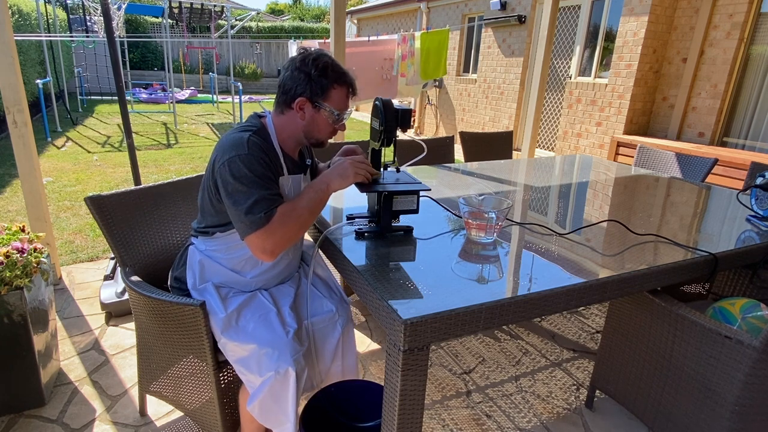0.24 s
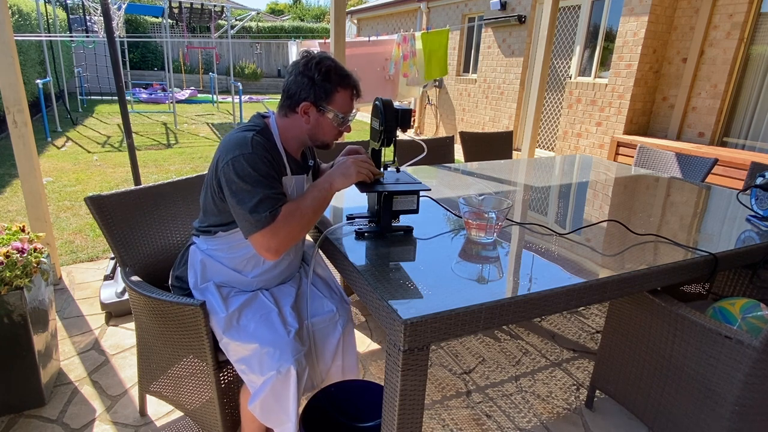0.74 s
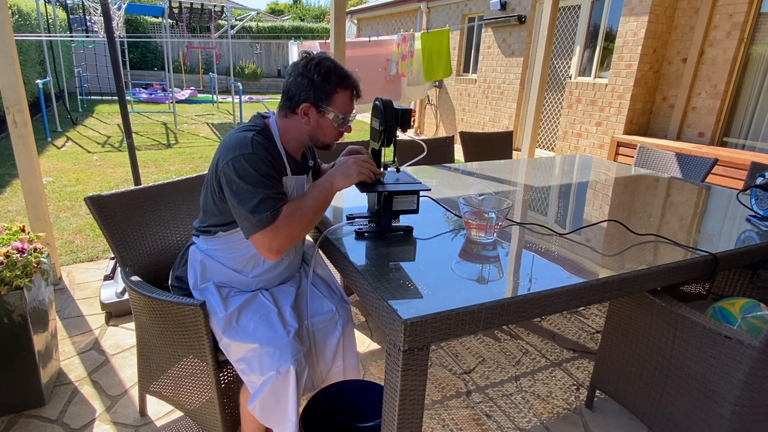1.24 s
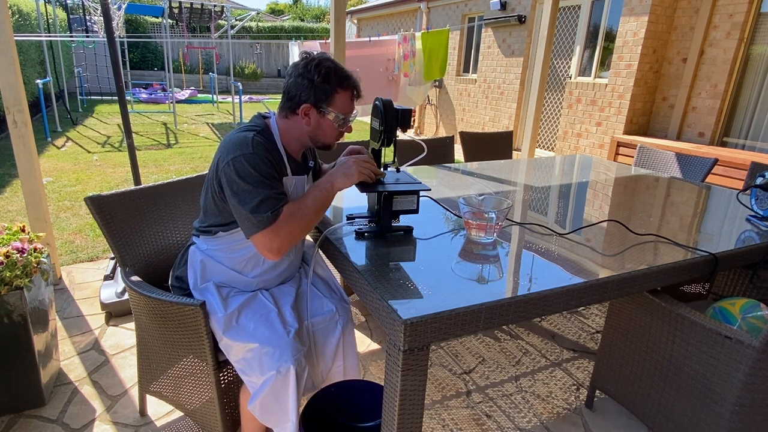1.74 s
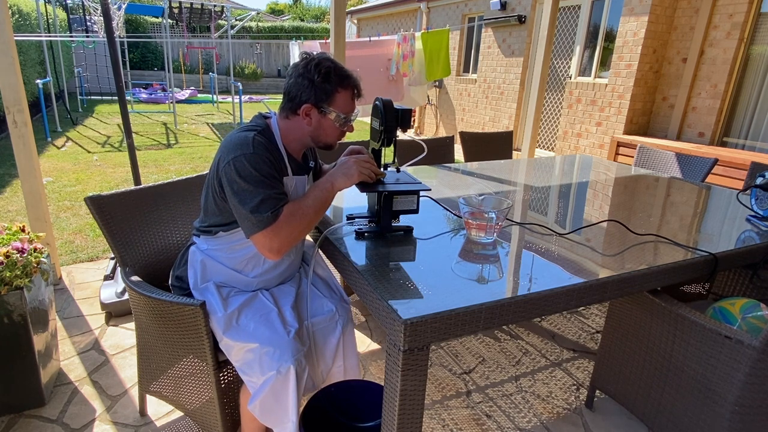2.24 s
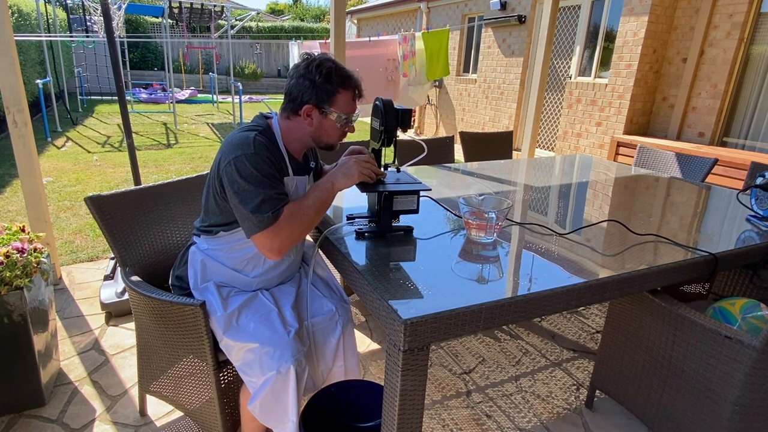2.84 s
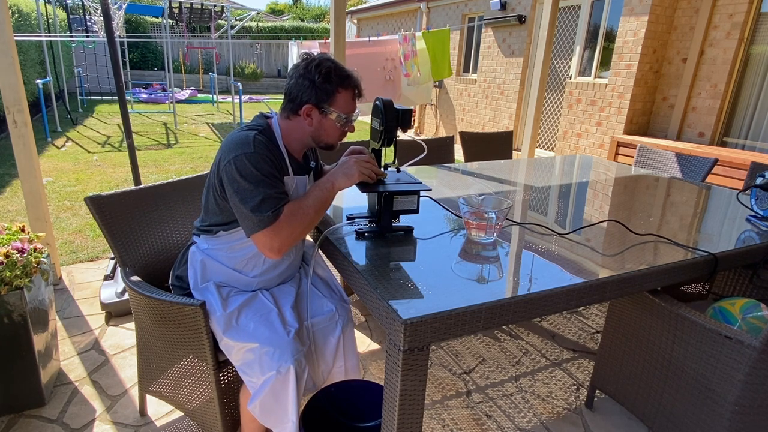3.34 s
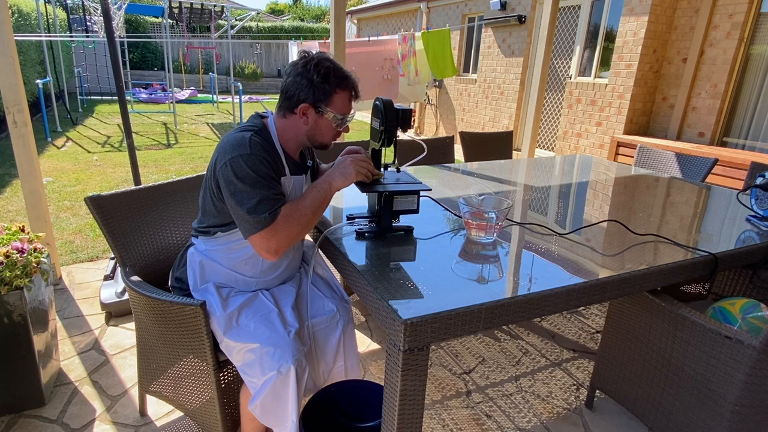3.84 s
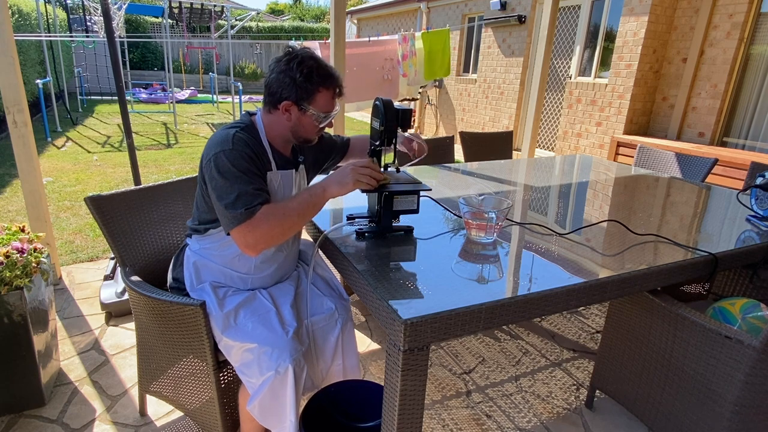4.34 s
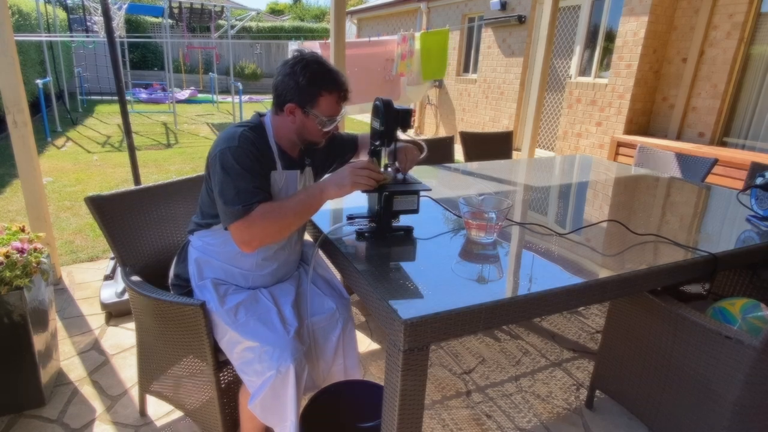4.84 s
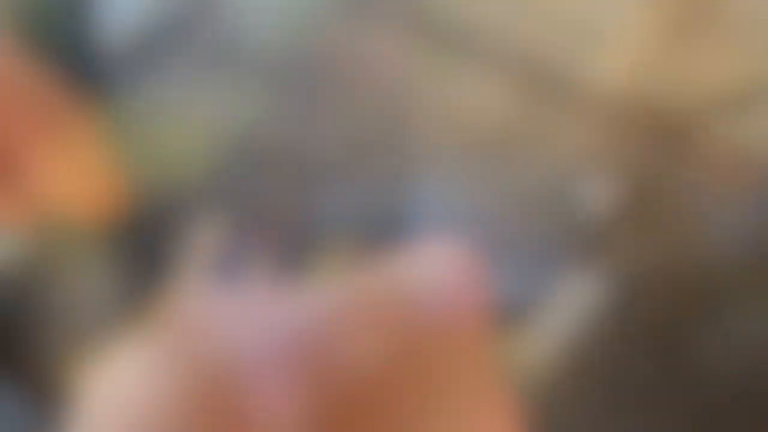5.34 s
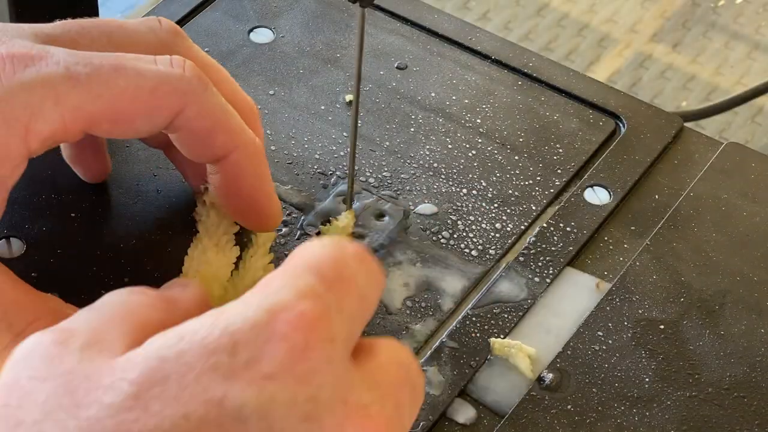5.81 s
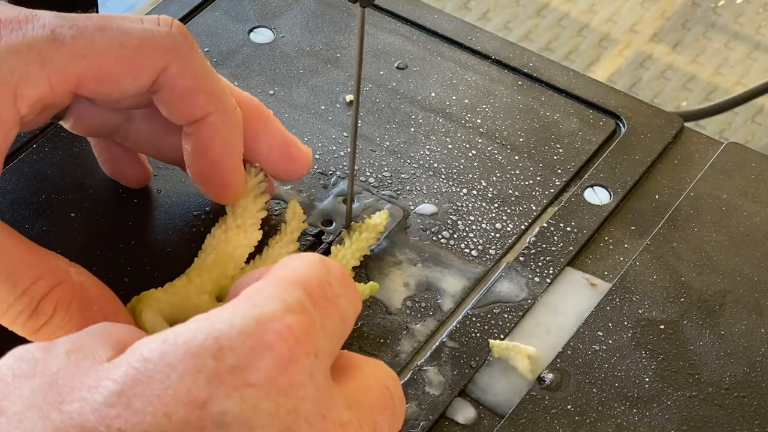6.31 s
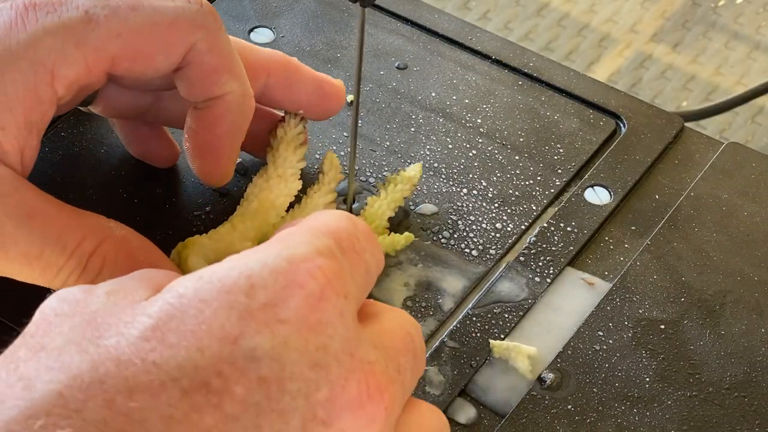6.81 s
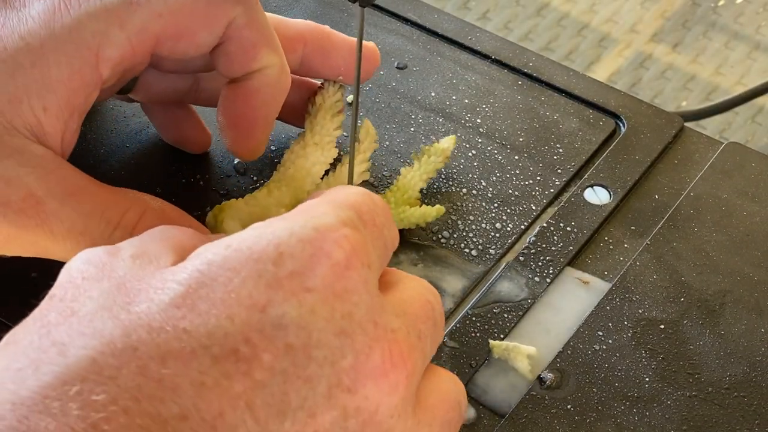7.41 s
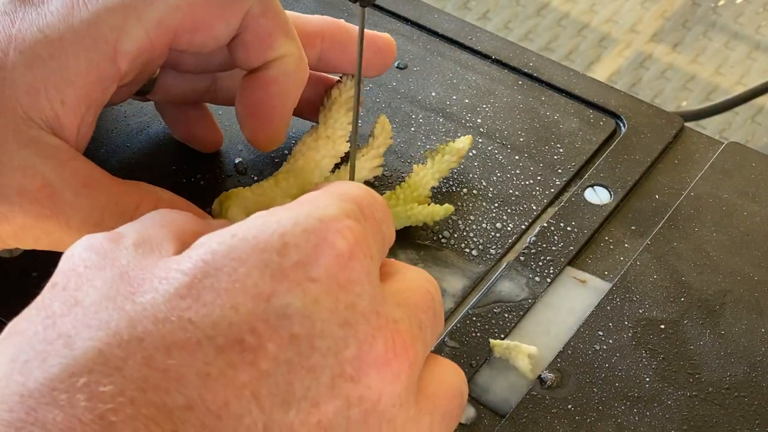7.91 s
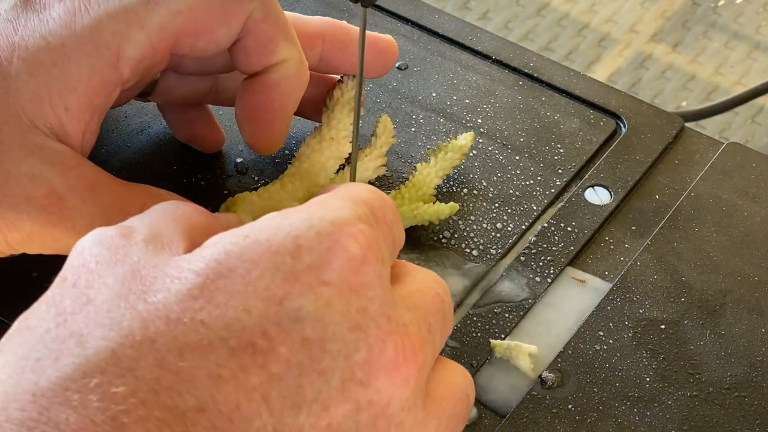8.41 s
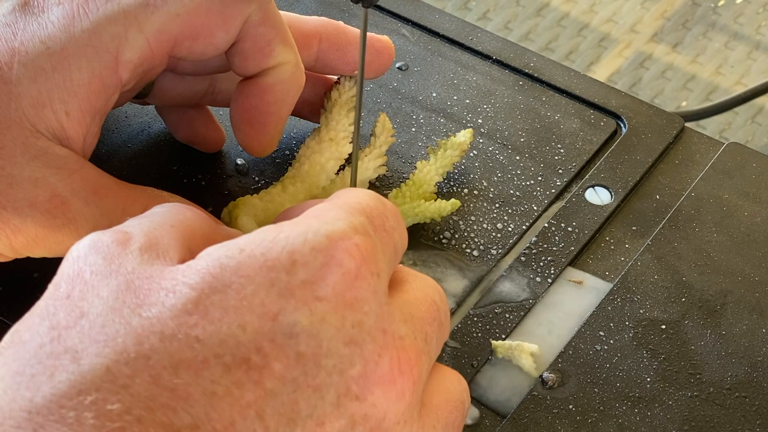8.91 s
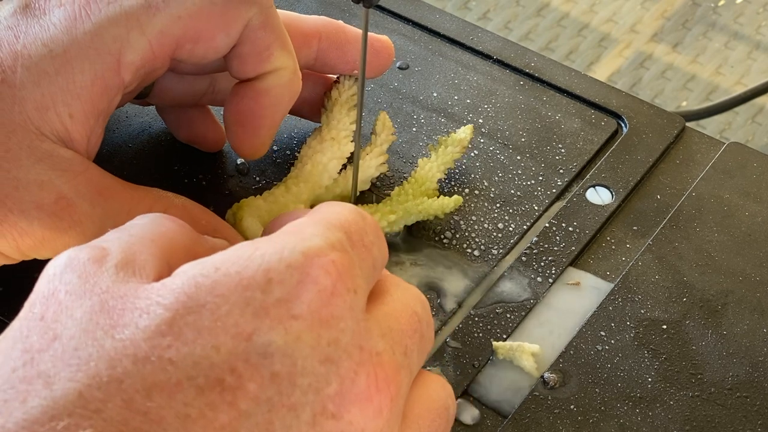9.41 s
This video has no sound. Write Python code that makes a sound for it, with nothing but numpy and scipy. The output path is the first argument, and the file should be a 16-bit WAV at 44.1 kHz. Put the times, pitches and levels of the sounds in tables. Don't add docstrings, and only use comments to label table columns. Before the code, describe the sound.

Gritty, ringing sawing over a motor drone: light touch, loud heavy cut, crackly skimming, then a softer close view building into another deep cut.

```python
import sys
import numpy as np
from scipy import signal
from scipy.fft import rfft, irfft, next_fast_len
from scipy.io import wavfile
from scipy.ndimage import uniform_filter1d, map_coordinates

SR = 44100
rng = np.random.default_rng(int(sys.argv[2]) if len(sys.argv) > 2 else 0)


def persist_wave(psi):
    counts = np.round(np.clip(psi, -1, 1) * 32767).astype(np.int16)
    wavfile.write(sys.argv[1], SR, np.atleast_2d(counts).T)


def invert_db(level):
    return 10 ** (np.asarray(level, dtype=float) / 20)


N = 426006
SECONDS = np.arange(N) / SR
SIZE = next_fast_len(N + 8192)
HZ = np.fft.rfftfreq(SIZE, 1 / SR)

# t/s, stage (0 far first touch, 1 far heavy cut, 2 far skimming, 3 near light touch,
# 4 near heavy cut; fractions blend), unevenness of the rubbing
STAGE = [(0, 0.41, 1.15), (1.14, 0.54, 1.13), (1.3, 1.35, 1.28), (3.55, 0.89, 0.57), (3.64, 2.31, 1.4),
         (5.05, 2.01, 1.43), (5.5, 2.7, 0.9), (7.6, 2.98, .7), (8.0, 3.5, 0.81), (8.6, 3.73, 0.85),
         (9.66, 4.22, 0.94)]
# t/s, level/dB
FEED = [(0, -2), (1.02, -0.5), (1.14, -2.5), (1.3, 2), (1.89, 5.5), (3.37, 4.5), (3.55, 3.5), (3.64, -3),
        (5.05, -3.5), (5.6, -4.5), (5.9, -4.5), (7.59, -3), (8.07, .4), (9.25, 3), (9.4, 7), (9.66, 8.5)]
# start t/s, end t/s
FADE_S = (5.05, 5.6)
PASSES_S = [
    0,
    1.27,
    3.6,
    5.55,
    8.1,
]


def unit(x):
    return x / np.sqrt(np.mean(x ** 2) + 1e-20)


def along(points, hz):
    f, v = np.transpose(points)
    return np.interp(np.log(hz + 1), np.log(f + 1), v)


def curves(rows):
    s, *cols = np.transpose(rows)
    return [np.interp(SECONDS, s, c) for c in cols]


def in_pass(table, s=SECONDS):
    return np.asarray(table)[np.searchsorted(PASSES_S, s, "right") - 1].T


def nearness():
    return np.interp(SECONDS, FADE_S, [0, 1])


def wobble(rate):
    coarse = SECONDS[::16]
    knots = rng.standard_normal(int(N * rate / SR) + 4)
    return np.interp(SECONDS, coarse, map_coordinates(knots, [coarse * rate]))


def spectrum(x, gain, lo_hz=0, hi_hz=SR):
    gain = np.asarray(gain, np.float32)
    in_band = (HZ >= lo_hz) & (HZ <= hi_hz)
    power = np.sum(gain[..., in_band] ** 2, axis=-1, keepdims=True) / len(HZ)
    return rfft(x.astype(np.float32), SIZE) * (gain / np.sqrt(power))


def filtered(x, gain, *band):
    return irfft(spectrum(x, gain, *band), SIZE)[..., :N]


def staged(colours, x, window, *band):
    return spectrum(x, colours * window.astype(np.float32), *band)


def bursts(events, rise, fall, scatter_db=0):
    s, db = np.transpose(events)[:2]
    kicks = np.bincount((s * SR).astype(int), invert_db(db + scatter_db * rng.standard_normal(len(s))), N)[:N]
    t = np.arange(-SR // 20, SR // 20 + 1) / SR - rise
    shape = np.exp(-(t / np.where(t < 0, rise, fall)) ** 2)
    return signal.fftconvolve(kicks, shape, "same") * rng.standard_normal(N)


def wheel():
    # t/s, turns behind a steady wheel
    lag = [(0, .82), (1.22, .675), (1.45, .62), (1.7, .7), (2.2, 1.04), (2.6, 1.17), (3.45, 1.22),
           (3.8, 1.21), (5.45, 1.235), (5.6, 1.25), (7.8, .17), (8.05, .15), (8.36, .23), (8.62, .42),
           (9.66, .42)]
    wheel_hz = 11.5
    return wheel_hz * SECONDS - uniform_filter1d(curves(lag)[0], size=SR // 8)


def contact_db():
    # once-a-turn swing/dB, angle/turns, twice-a-turn swing/dB, angle/turns
    swing = [
        (2, 0.19, 0.1, .01),
        (1.56, 0.0029, 1.1, 0.16),
        (0, -0.092, 1.2, -0.16),
        (2.5, -0.17, 0.1, .02),
        (0.5, -0.17, -0.8, 0.025),
    ]
    once_db, once, twice_db, twice = in_pass(swing)
    turns = wheel()
    return once_db * np.cos(2 * np.pi * (turns - once)) + twice_db * np.cos(4 * np.pi * (turns - twice))


def levels_db():
    parts = [
        (-29, -0.08, -33.5, 0.18),
        (-30.5, 0.24, -37, 0.62),
        (-36, 0.74, -41, 0.82),
        (-35.5, 1, -46, 1),
    ]
    frame_db = [-0.5, 0, -3, -1, 0.5]
    settle_s = 0.25
    feed_db, near = curves(FEED)[0], nearness()
    frame, *rest = [(1 - near) * (far_db + far * feed_db) + near * (near_db + close * feed_db)
                    for far_db, far, near_db, close in parts]
    change_db = in_pass(frame_db, abs(SECONDS - settle_s))
    return [frame + uniform_filter1d(change_db, size=SR // 5), *rest]


def breeze():
    # t/s, level/dB
    air_db = [(0.0, -59), (0.35, -73), (3.23, -61), (3.61, -80), (5.06, -66), (6.75, -57), (7.53, -74.5),
              (9.39, -60), (9.66, -54)]
    # f/Hz, level/dB per Hz
    rumble = [(15, -22), (30, -14.5), (50, -7), (90, -4), (150, -7), (300, -63.5)]
    air = filtered(rng.standard_normal(N), invert_db(along(rumble, HZ)))
    return invert_db(curves(air_db)[0] - 0.5 + 2.2 * wobble(6.5)) * air


def motor():
    # f/Hz, level/dB per Hz
    tone = [(35, -54), (60, -26), (70, -28), (113, -9), (132, -15), (162, -21), (195, -10.5), (233, -14),
            (297, -8.5), (330, -20.5), (430, 0), (730, -120)]
    # t/s, level/dB
    drone = [(0, 0), (3.5, 1), (5, 0.5), (5.3, -2), (5.6, 1.5), (7.0, 0), (7.7, -2), (8.4, -2), (8.8, 1),
             (9.66, -1.5)]
    hump_db = 3.4 * 2 ** -((HZ - 123) / 9) ** 2
    noise = filtered(rng.standard_normal(N), invert_db(along(tone, HZ) + hump_db))
    strain_db = 0.14 * curves(FEED)[0] + 0.34 * contact_db()
    return invert_db(-48 + curves(drone)[0] + strain_db) * noise


def bumps():
    # t/s, peak level/dB, f/Hz
    knocks = [(5.586, -28, 200), (5.935, -27, 243), (6.135, -33, 130), (6.276, -35, 140), (6.364, -25, 210),
              (6.393, -29, 151), (6.58, -40, 100), (6.612, -32, 130), (6.658, -34, 150), (6.783, -33, 120),
              (6.819, -34, 120), (6.838, -27, 150), (6.852, -37, 120), (6.345, -35, 130), (6.51, -37, 130),
              (7.03, -40, 120), (8.47, -45, 80), (9.5, -46, 80)]
    out, t = np.zeros(N + SR), np.arange(-SR // 40, SR // 40) / SR
    for s, db, hz in knocks:
        push = np.exp(-(t * hz / 0.5) ** 2) * np.sin(2 * np.pi * hz * t + rng.uniform(0, 2 * np.pi))
        out[round(s * SR) - SR // 40:][:len(t)] += invert_db(db) * push
    low = HZ / (60 + HZ) / (1 + (HZ / 340) ** 3)
    rough = filtered(bursts(knocks, rise=0.0047, fall=0.036), low)
    return out[:N] + invert_db(-18) * rough


def whine():
    # multiple, level/dB
    far_orders = [(30, -52), (36, -50), (39, -42), (41, -39), (43, -37), (45, -33), (57, -51), (63, -47),
                  (72, -43), (73, -49)]
    # multiple, level/dB
    near_orders = [(28, -53), (31, -46), (35, -49), (39, -49), (41, -46), (42, -41), (43, -37), (53, -55),
                   (64, -51), (68, -50), (88, -50)]
    shaft_db = [0, -2.5, -0.3, -0.5, -14]
    hop = 8
    turns = wheel()[::hop]

    def line(multiple, db):
        level = invert_db(db + 1.5 * wobble(3)[::hop])
        return level * np.sin(2 * np.pi * multiple * turns + 0.4 * wobble(5)[::hop])

    far, close = (signal.resample_poly(sum(line(*order) for order in orders), hop, 1)[:N]
                  for orders in (far_orders, near_orders))
    near = nearness()
    return invert_db(uniform_filter1d(in_pass(shaft_db), size=SR // 5)) * ((1 - near) * far + near * close)


def squeal():
    # t/s, level/dB
    song = [(7.55, -85), (7.68, -63), (7.8, -74), (7.96, -56), (8.06, -66), (8.2, -66), (8.42, -67),
            (8.8, -72), (9.0, -85)]
    tone = filtered(rng.standard_normal(N), 1 / (1 + (2 * (HZ - 11350) / 550) ** 2))
    return invert_db(curves(song)[0] + 3.5 + 1.8 * wobble(30)) * tone


def scrape():
    # t/s, peak level/dB
    slips = [(5.695, -35), (5.705, -31), (5.716, -43), (5.726, -35), (5.737, -42), (5.747, -38),
             (5.762, -34), (5.776, -38), (5.787, -37), (5.797, -42), (5.806, -35), (5.816, -37),
             (5.826, -40), (5.836, -40)]
    # f/Hz, level/dB per Hz
    wet = [(2650, -41), (4500, -11), (5020, -13), (5400, -5), (6910, -1), (9410, -9), (13800, -9),
           (15700, -5)]
    # f/Hz, width/Hz, level/dB
    steel_top = [(5740, 300, 3), (6940, 500, 5), (7780, 300, 4), (9920, 500, 6), (12900, 400, 3),
                 (14100, 600, 5), (15500, 300, 3)]
    modes_db = sum(db * 2 ** -(2 * (HZ - hz) / width) ** 2 for hz, width, db in steel_top)
    stutter = bursts(slips, rise=0.0019, fall=0.008)
    return invert_db(-13.5) * filtered(stutter, invert_db(along(wet, HZ) + modes_db), 9600, 16000)


def saw_colour(stage):
    # f/Hz, level/dB per Hz
    far_colours = [
        [(150, -60), (300, -17), (400, 19), (600, 14), (1200, 13.5), (1750, 15.5), (2100, 5), (3300, 9.5),
         (5000, 2.5), (6300, -4), (9300, -14), (11000, -17), (14000, -31), (15700, -29.5)],
        [(150, -52), (300, 6.5), (400, 10.5), (600, 8), (1200, 13), (1750, 13.5), (2100, 4), (3300, 10.5),
         (5000, 10), (6300, 10), (9300, 8.5), (11000, 3), (14000, -2.5), (15700, -6)],
        [(150, -60), (300, -2), (400, 16.5), (600, 11), (1200, 11), (1750, 16), (2100, 1), (3300, 8.5),
         (5000, 0), (6300, -5.5), (9300, -2), (11000, -12.5), (14000, -15), (15700, -26)],
    ]
    # f/Hz, level/dB per Hz
    near_colours = [
        [(150, -39), (290, 8), (340, 5), (620, 10), (1350, 8), (1650, -3.5), (2600, -1), (3800, -4.5),
         (4400, -19.5), (6200, -18.5), (8600, -22), (9600, -31), (12500, -30), (15700, -34)],
        [(150, -58.5), (290, -3), (340, 16), (620, 12.5), (1350, 11.5), (1650, 1.5), (2600, 4), (3800, 3.5),
         (4400, -10.5), (6200, -3), (8600, -7), (9600, -13), (12500, -16.5), (15700, -15)],
    ]
    # f/Hz, width/Hz, level/dB over the colour at each of the three far stages
    far_modes = [(487.4, 61, 16, 13.6, 9), (499, 44, 1.9, 1.2, 5), (529, 33, 3.5, 5, 4),
                 (723, 48, 9.2, 7.7, 10), (820, 43, 3, .5, -0.5), (841, 172, 8.8, 2.8, 9.5),
                 (905, 50, .5, 4.7, 1), (1433, 56, .5, .5, 5), (1656, 34, 2, 1, 2.5),
                 (3380, 44, 2, 1.7, 1.5), (4570, 40, 2, 2, 8), (1038, 95, 5.7, 2.1, 12.5),
                 (1298, 245, 9, 5.6, 0.5), (2350, 52, 3.4, 8.2, 6), (2814, 63, 4, 7.4, 5),
                 (3146, 77, 5, 6.9, 7), (3813, 180, 7.3, 5.5, 1.5), (4036, 49, 2, 10.2, 4),
                 (4303, 39, 2, 2.4, 8.5), (4880, 89, 3, 0.52, 4), (5627, 500, 5.7, 8.4, 8),
                 (5800, 150, 7, 1.7, -2), (6665, 150, 3.6, 8, 6.5), (7330, 460, 9.5, 4, 5),
                 (7770, 320, 1, 0.68, 3), (8980, 570, 2.4, 6.1, -0.5), (10000, 390, 1.5, 4.6, -5.5),
                 (13100, 900, 1, 3.3, -4), (14940, 900, 1, 6.1, 3)]
    # f/Hz, width/Hz, level/dB over the colour at each of the two near stages
    near_modes = [(339, 15, 4, 6.5), (369, 42, 8.5, 0), (480, 116, 11.5, 1), (517, 28, 3.5, 2.5),
                  (769, 100, 7.5, 5.5), (817, 19, 5.5, -3), (885, 130, 0.5, 0), (1053, 39, 6, 7),
                  (1270, 57, 6.5, 0), (1740, 94, -1, 0), (1883, 39, 11, 6.5), (2302, 325, 9.5, 9),
                  (2850, 150, 7.5, -1), (3396, 90, 7, 4), (3650, 240, 4.5, 2), (5610, 430, 4.5, 0.5),
                  (6900, 60, 1, 0), (7960, 860, 3, 1.5), (2290, 63, 3.5, 1.5), (9500, 300, -2, 2),
                  (10550, 250, 3, 1.5), (12500, 350, -3, 3.5), (13700, 400, 1.5, .5)]
    broad = [*far_colours, *near_colours][stage]
    centre, width, *db = np.transpose(far_modes if stage < 3 else near_modes)
    grid = np.arange(0, SR / 2, 5)
    peaks = np.sum(db[stage % 3] * 2 ** -(2 * (grid[:, None] - centre) / width) ** 2, axis=1)
    return invert_db(np.interp(HZ, grid, along(broad, grid) + peaks))


def machine():
    stage, count = curves(STAGE)[0], np.arange(5)
    shares = np.clip(1 - abs(stage - count[:, None]), 0, 1)
    return shares, np.array([saw_colour(k) for k in count], np.float32)


def ticks(colours):
    draw = rng.random((760, 2))
    grains = np.column_stack([draw[:, 0] * (N - 1) / SR, 9.5 * draw[:, 1]])
    level_db = levels_db()[3] + 9 * (curves(STAGE)[1] - 1)
    bright = 1 / np.sqrt(1 + (5500 / (HZ + 1)) ** 4) * (HZ / 8000) ** 0.1
    return staged(colours, invert_db(level_db - 9) * bursts(grains, rise=0.0012, fall=0.0022), bright)


def catches(rows):
    rasp_db = [-27.5, -20, -28, -35.5, -27.5]
    s, db = np.transpose(rows)[:2]
    fading = np.interp(s, FADE_S, [0, 1]) * (s < PASSES_S[3] - 0.02)
    steady_db = in_pass(rasp_db, s) - 11 * fading
    over = np.clip(1 - invert_db(2 * (steady_db - db)), 0.03, 1)
    return np.column_stack([s, db + 10 * np.log10(over) + 4 * fading])


def above(corner_hz):
    return 1 / np.sqrt(1 + (corner_hz / (HZ + 1)) ** 6)


def between(lo_hz, hi_hz):
    return above(lo_hz) * np.sqrt(1 - above(hi_hz) ** 2)


def snags(colours):
    # t/s, grit peak level/dB
    touch_snags = [(0.016, -22), (0.0712, -22.5), (0.1526, -20.5), (0.1755, -21), (0.2064, -20),
                   (0.2414, -19), (0.2733, -26), (0.3087, -25.5), (0.3506, -25), (0.3706, -24),
                   (0.4648, -23), (0.4958, -21.5), (0.5312, -26), (0.5851, -24), (0.618, -20.5),
                   (0.6664, -23.5), (0.7043, -20.5), (0.7567, -21), (0.7906, -24), (0.8395, -25.5),
                   (0.8759, -24), (0.9293, -20.5), (0.9622, -22), (1.0106, -22.5), (1.048, -22),
                   (1.0774, -22), (1.133, -21), (1.1687, -27), (1.1902, -20.5), (1.2196, -23),
                   (1.2376, -20)]
    # t/s, grit peak level/dB
    heavy_snags = [(1.2753, -22), (1.2938, -18), (1.3162, -15.5), (1.3372, -18.5), (1.3567, -16.5),
                   (1.405, -16), (1.446, -14.5), (1.4719, -17), (1.4938, -17), (1.5343, -17),
                   (1.5717, -16.5), (1.6216, -16.5), (1.6734, -14.5), (1.7114, -14), (1.7637, -17),
                   (1.8161, -16.5), (1.8565, -17), (1.896, -13.5), (1.9488, -17), (1.9882, -13),
                   (2.0421, -16), (2.065, -18), (2.0825, -14.5), (2.1384, -17.5), (2.1786, -14),
                   (2.2307, -18), (2.2711, -11), (2.31, -17), (2.3309, -21), (2.3584, -16), (2.4008, -20),
                   (2.4222, -15), (2.449, -15.5), (2.4951, -17.5), (2.5265, -13), (2.5739, -16.5),
                   (2.6198, -17), (2.6612, -16.5), (2.6906, -14.5), (2.7136, -14), (2.759, -15),
                   (2.794, -13), (2.8393, -20), (2.8572, -16), (2.9276, -19.5), (2.962, -14), (3.0603, -15),
                   (3.1027, -20), (3.1356, -13.5), (3.1865, -15), (3.2344, -20), (3.2748, -17.5),
                   (3.3007, -19), (3.32, -14), (3.413, -23), (3.4584, -16), (3.4993, -15)]
    # t/s, grit peak level/dB, body over grit/dB
    skim_snags = [(3.5753, -17.5, -2.5), (3.6052, -22.5, -7), (3.6576, -21, -4), (3.6885, -26, -3),
                  (3.7075, -30, -1), (3.743, -18, -6), (3.774, -19.5, -7), (3.7958, -20, -3),
                  (3.8247, -19.5, -3), (3.8576, -18, -11), (3.907, -21, -5.5), (3.9464, -17.5, -6),
                  (4.0006, -18, -4), (4.0307, -24, -6), (4.0507, -22.5, -10), (4.087, -17.5, -9),
                  (4.117, -23, -1), (4.1385, -25, -8), (4.1724, -28, -5), (4.2043, -22.5, -8),
                  (4.226, -16.5, -5), (4.262, -18, -5.5), (4.294, -19.5, -6.5), (4.3286, -27.5, 3),
                  (4.347, -31, -1), (4.3784, -21.5, -13), (4.4149, -30, -1), (4.4353, -26, -1),
                  (4.4666, -18, -6.5), (4.522, -18, -6), (4.5521, -27, -2), (4.574, -24, -13),
                  (4.6094, -24, -5), (4.6399, -20, -8), (4.6972, -19, -6.5), (4.7277, -24, -10),
                  (4.7476, -23.5, -4.5), (4.7835, -18, -8.5), (4.815, -18.5, -6), (4.8459, -24.5, -3),
                  (4.8688, -26, -3), (4.8818, -26, -4), (4.9013, -21, -7), (4.9571, -23, -4),
                  (4.992, -22, -3.5), (5.0477, -15.5, -9), (5.0764, -34, -5), (5.1322, -26.5, 0),
                  (5.1667, -23, -8), (5.1876, -29, -7), (5.218, -30, -2), (5.2515, -25, -8),
                  (5.272, -22, -6), (5.3068, -20, -8), (5.3418, -27, -9), (5.3916, -33, -1),
                  (5.4276, -35, -5), (5.462, -35, -4), (5.4824, -30, -5), (5.5164, -32, -9)]
    # t/s, peak level/dB
    light_snags = [(5.5484, -35), (5.5723, -31), (5.8686, -32), (5.904, -28), (6.0557, -29), (6.155, -26),
                   (6.3156, -31), (6.4029, -29), (6.5032, -30), (6.5536, -37), (6.5885, -28), (6.6359, -33),
                   (6.6593, -27), (6.7042, -31), (6.7382, -29), (6.8015, -33), (6.8374, -30), (6.9212, -25),
                   (6.9656, -31), (6.9866, -29), (7.0499, -32), (7.0854, -23.5), (7.1308, -32),
                   (7.1672, -28), (7.2016, -31), (7.229, -34), (7.2545, -25), (7.2939, -34), (7.3358, -24),
                   (7.4041, -25), (7.4645, -33), (7.4889, -29), (7.5723, -26.5), (7.6221, -26),
                   (7.671, -28), (7.7189, -25.5), (7.7528, -29), (7.8037, -38), (7.839, -25)]
    # t/s, peak level/dB
    deep_snags = [(7.9208, -25), (7.9801, -30), (8.0101, -26), (8.0545, -32), (8.0969, -29), (8.1483, -22),
                  (8.1842, -25), (8.2376, -25.5), (8.3209, -25), (8.3633, -22), (8.4132, -22), (8.457, -20),
                  (8.501, -24.5), (8.5514, -20), (8.6012, -23), (8.6446, -20.5), (8.686, -23), (8.726, -23),
                  (8.8133, -24), (8.8452, -27), (8.9055, -21), (8.9275, -23), (8.9869, -22.5),
                  (9.0318, -27), (9.0567, -23), (9.0777, -23), (9.1171, -22), (9.158, -20), (9.2054, -24),
                  (9.2513, -21.5), (9.2942, -27), (9.3181, -22.5), (9.4244, -25), (9.4603, -26),
                  (9.5112, -22), (9.5995, -18.5)]
    far, near = colours[:3], colours[3:]
    touch, heavy, skim = catches(touch_snags), catches(heavy_snags), catches(skim_snags)
    light = np.vstack([touch, skim])
    body_db = -8
    skim_body = skim + np.array(skim_snags)[:, 2:] * [0, 1]
    weighty = np.vstack([touch + [0, body_db], heavy + [0, body_db], skim_body])
    buried = 2.05

    def gritty(rise, fall, scatter_db):
        slow = bursts(heavy, buried * rise, buried * fall, scatter_db)
        return bursts(light, rise, fall, scatter_db) + invert_db(-4.5) * slow

    body_swell = bursts(weighty, rise=0.0026, fall=0.013, scatter_db=1.5)
    body = staged(far, body_swell, between(1310, 4900), 1800, 6200)
    grit = staged(far, gritty(0.0011, 0.006, 1.3), between(6100, 10000))
    fine = staged(far, gritty(0.0011, 0.0033, 3.0), above(8900))
    near_catches = np.vstack([catches(light_snags), catches(deep_snags)])
    near_swell = bursts(near_catches, rise=0.002, fall=0.0096)
    close = staged(near, near_swell, between(900, 4700), 2000, 9000)
    return invert_db(-5.5) * body + invert_db(-10) * grit + invert_db(-13) * fine, invert_db(-12.5) * close


def rubbing(colours):
    edges = [315, 650, 1900, 4300, 16000]
    # wheel share, chatter/dB, lift/dB, own unevenness/dB, trim/dB
    follow = [(0.089, 0.083, 0.3, 1.2, -0.55), (0.39, 0.98, 0.35, 0.35, -0.62),
              (0.67, 1.03, 1.5, 0.95, -0.54), (0.71, 1.27, 0.98, 1.24, -0.22)]
    wheel_db, uneven = contact_db(), curves(STAGE)[1]
    chatter = unit(1.1 * wobble(40) + wobble(130))
    lift = -np.maximum(wobble(80) - 1, 0)
    out = 0
    for level_db, lo, hi, shares in zip(levels_db(), edges, edges[1:], follow):
        share, chatter_db, lift_db, own_db, trim_db = shares
        rough_db = chatter_db * chatter + lift_db * lift + own_db * wobble(120)
        force = unit(invert_db(share * wheel_db + uneven * rough_db) * rng.standard_normal(N))
        window = 1 / np.sqrt((1 + (lo / (HZ + 1)) ** 24) * (1 + (HZ / hi) ** 24))
        out = out + staged(colours, invert_db(level_db + trim_db) * force, window)
    return out


def patchy(x, patch_db):
    hz, _, z = signal.stft(x.astype(np.float32), SR, nperseg=256)
    field = uniform_filter1d(rng.standard_normal(z.shape), size=3, axis=0)
    field = uniform_filter1d(field, size=4, axis=1)
    depth_db = patch_db / (1 + (3000 / (hz + 1)) ** 2)
    return signal.istft(z * invert_db(depth_db[:, None] * unit(field)), SR, nperseg=256)[1][:N]


def scene():
    shares, colours = machine()
    spectra = rubbing(colours) + np.vstack(snags(colours)) + ticks(colours)
    stages = irfft(spectra, SIZE)[:, :N]
    cut = patchy(np.sum(shares * stages, axis=0), patch_db=1.7)
    return (breeze() + motor() + bumps() + whine() + squeal() + scrape() + cut)[None]


def low_pass(x):
    return signal.sosfilt(signal.butter(12, 16780, fs=SR, output="sos"), x)


def record(dry):
    limited = irfft(rfft(dry, SIZE) * (HZ < 15790), SIZE)[..., :N]
    return low_pass(limited)


dry = scene()
out = record(dry)
persist_wave(out)
```